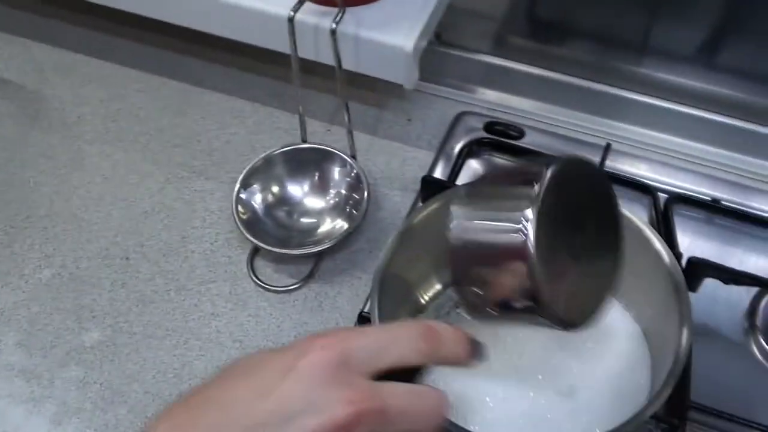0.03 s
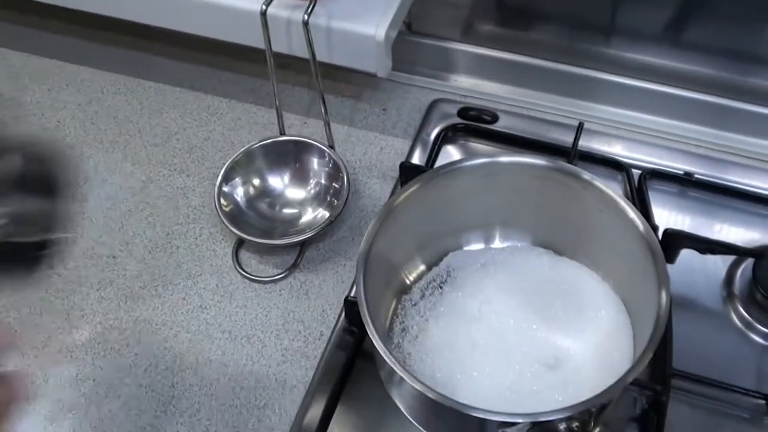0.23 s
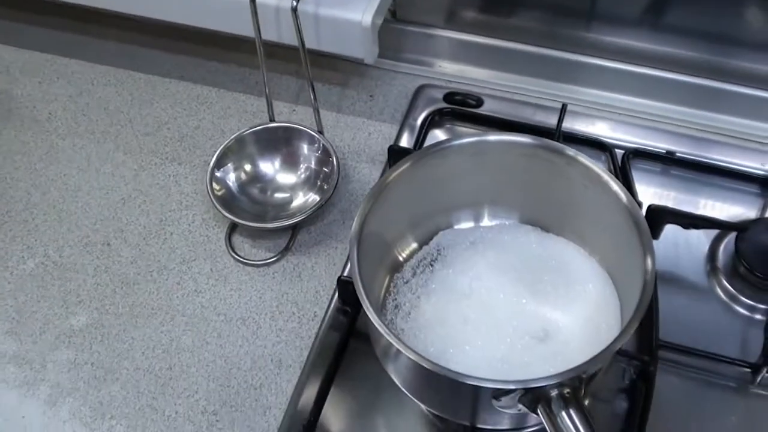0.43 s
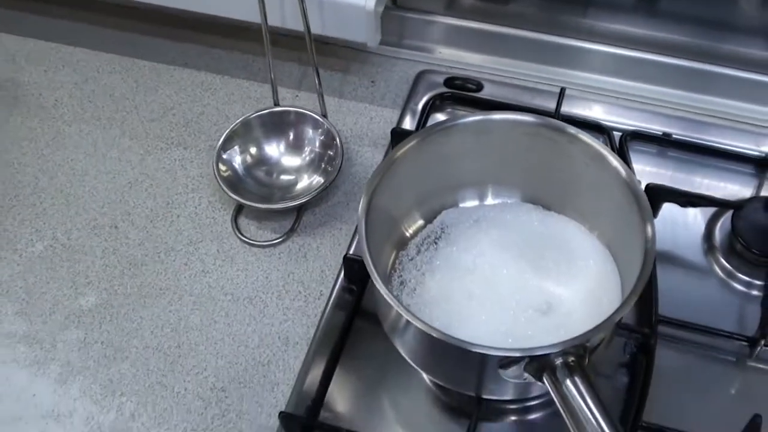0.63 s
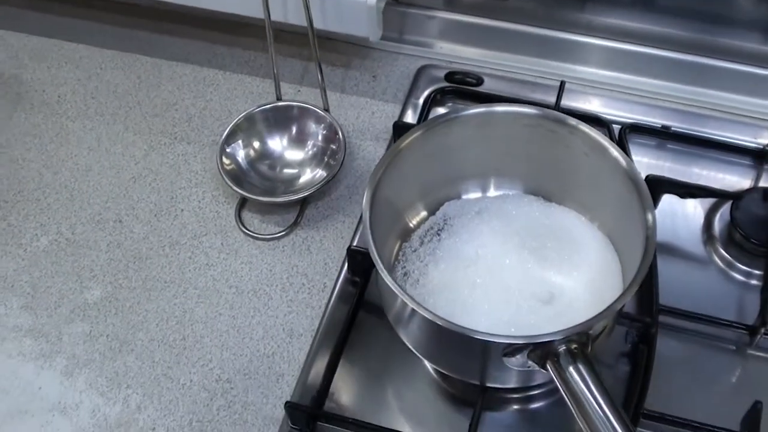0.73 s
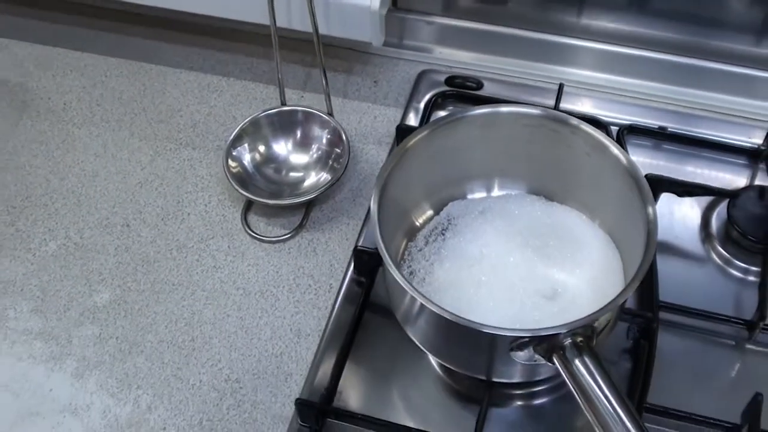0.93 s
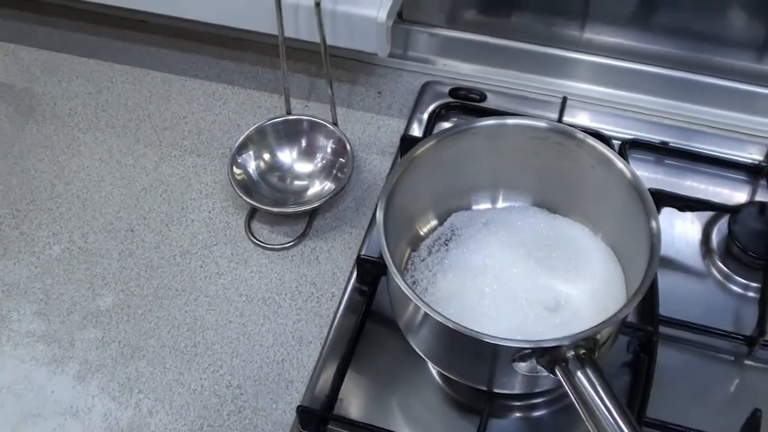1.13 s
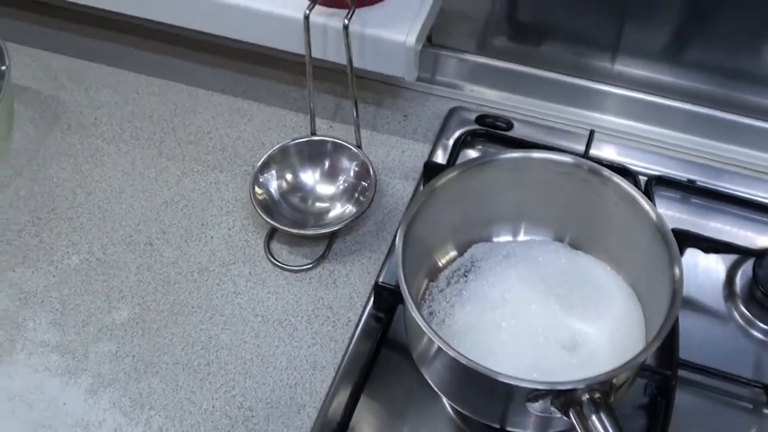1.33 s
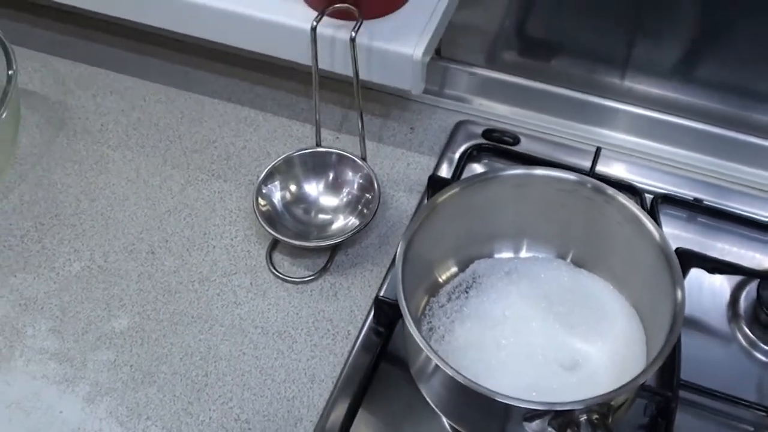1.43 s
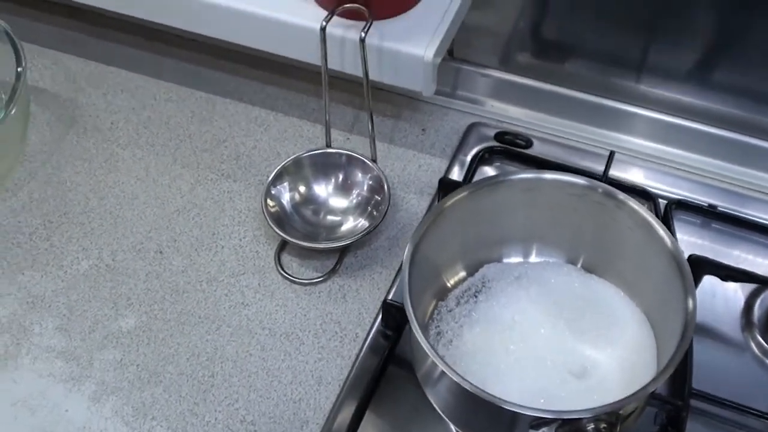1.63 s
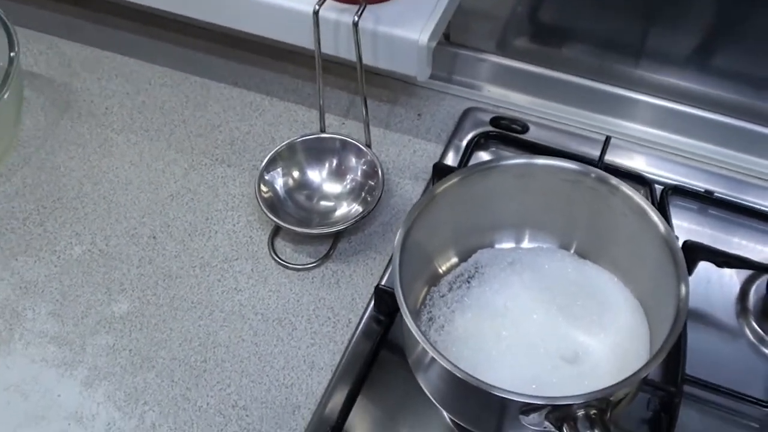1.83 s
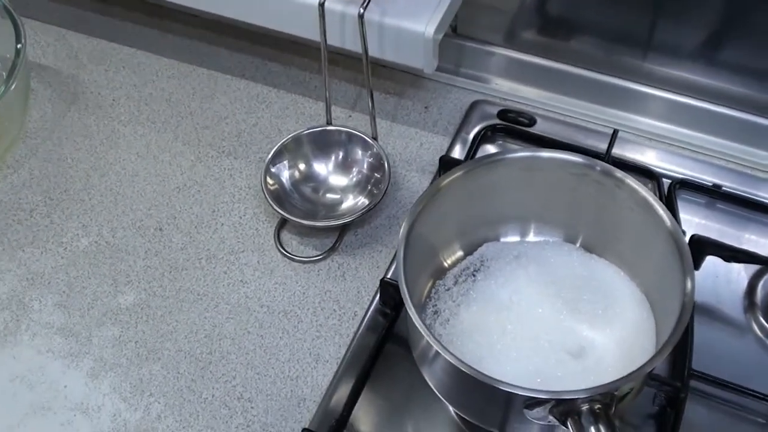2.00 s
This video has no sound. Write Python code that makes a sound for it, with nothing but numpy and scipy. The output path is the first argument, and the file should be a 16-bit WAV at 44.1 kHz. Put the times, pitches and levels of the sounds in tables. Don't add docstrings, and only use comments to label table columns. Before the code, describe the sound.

A metal cup clatters onto a hard kitchen worktop after a last faint hiss of sugar into a saucepan, then drags and bumps over grit; a metal bowl lands at the end. Close stereo microphone, low fan hum.

```python
import sys
import numpy as np
from scipy import signal
from scipy.fft import rfft, irfft, next_fast_len
from scipy.io import wavfile
from scipy.ndimage import map_coordinates

SR = 44100
rng = np.random.default_rng(int(sys.argv[2]) if len(sys.argv) > 2 else 0)


def gain_from_decibels(decibels):
    exponent = np.asarray(decibels, float) / 20
    return 10 ** exponent


def persist_wave(psi):
    counts = np.round(np.clip(psi, -1, 1) * 32767).astype(np.int16)
    wavfile.write(sys.argv[1], SR, np.atleast_2d(counts).T)


N = 91022

# t/s, worktop thud level/dB, base ring level/dB, clink level/dB, contact/ms
CUP_CONTACTS = [(0.711, -18.5, -2, -22, 1.03), (0.734, -26, -7, -51, 1.3), (.738, -21, -7, -36, 2),
                (.762, -32, -20.5, -36.5, 32), (0.802, -26.5, -9.5, -28.5, 3.9),
                (.826, -31.5, -42, -64, 3.8), (.86, -31, -31, -45, 120), (.914, -35, -52, -20, 8.8),
                (0.927, -20, -8.5, -13, 3.4), (0.939, -21.5, -28.5, -17.5, 7.5),
                (.984, -29, -46, -12.5, 2.75), (1.001, -20.5, -44, -25, 10), (1.023, -33.5, -55, -26, 3.3),
                (1.045, -36, -61, -35.5, 45)]
# f/Hz, level/dB
WORKTOP_COLOUR = [(150, -52), (290, -2), (430, -4.5), (490, -4.5), (800, 2), (1150, -1.5), (1500, -7.5),
                  (2300, -65)]
# f/Hz, t60/s
WORKTOP_T60 = [(300, 0.1), (900, 0.038), (2000, 0.026)]
# f/Hz, level/dB, t60/s
BASE_MODES = [(292, -12, .05), (433, -14, .04), (620, -14, .05), (790, -4, .018), (955, -7, .03),
              (1077, -12, .04), (1245, 0, .035), (1290, 2, .04), (1323, -18, .4), (1590, -30, .025)]
# f/Hz, level/dB, t60/s
WALL_MODES = [(2620, -12, .14), (2966, -18, .09), (4285, -3, .15), (4414, -16, .15), (5001, -15, .14),
              (5890, -9, .08), (6330, -9, .2), (6900, -12, .15), (7450, -10, .2), (7730, -13, .07),
              (8650, -14, .14), (10050, -20, .2), (10940, -21, .1), (12050, -22, .1)]
# f/Hz, level/dB
CRACK_COLOUR = [(900, -5.5), (3000, 3), (4300, -6.5), (7500, 4.5), (11000, -6.5), (15500, -18)]
# t/s, level/dB
EDGE_TAPS = [
    (0.735, -25.5),
    (.752, -40),
    (0.802, -34),
    (.914, -32),
]
# f/Hz, level/dB, t60/s
EDGE_MODES = [(1710, -2.5, 0.046), (2000, -1.5, 0.023), (2330, -10, .03)]
# t/s, level/dB
TINKLES = [
    (.13, -46.5),
]
# f/Hz, level/dB, t60/s
TINKLE_MODES = [(8750, 1, 0.53), (10000, -1, 0.29), (11300, -0.5, 0.42)]
# t/s, grit level/dB, rumble level/dB, wall ringing level/dB re grit
DRAG_LEVELS = [(1.16, -61, -57, -17), (1.183, -36, -39.5, -18), (1.22, -32, -43, -21.5),
               (1.26, -33.5, -60, -15), (1.29, -35.5, -30, -9.5), (1.32, -34.5, -38.5, -3),
               (1.36, -34, -38, -4.5), (1.41, -27.5, -33.5, -4), (1.455, -21.5, -39, -8),
               (1.5, -26.5, -28, -0.5), (1.54, -25.5, -24.5, -8.5), (1.58, -28, -31, -3.5),
               (1.64, -27, -34.5, -7), (1.71, -23.5, -28, -17), (1.76, -28.5, -29, -15),
               (1.82, -27, -37, -16), (1.9, -37.5, -39, -28), (1.96, -41, -41, -18)]
# f/Hz, level/dB
GRIT_COLOUR = [(600, -15.5), (1100, -4.5), (2300, -4.5), (3300, -6), (4900, -8), (6700, -5), (8500, -8),
               (15500, -37)]
# f/Hz, level/dB
RUMBLE_COLOUR = [(50, -42), (110, -13), (200, -7), (380, 3.5), (480, -6.5), (600, -4.5), (1200, -12),
                 (2500, -38)]
# f/Hz, width/Hz, level/dB
RIM_RESONANCES = [(4250, 220, 0), (6480, 160, -2), (6700, 160, 1), (6950, 260, -1), (8200, 300, -9)]
# t/s, level/dB, contact/ms
CATCHES = [
    (1.181, -42, 8),
    (1.284, -26.5, 10),
    (1.316, -26, 10),
    (1.376, -24, 8.9),
    (1.43, -31, 8),
    (1.448, -16, 10),
    (1.483, -29, 10),
    (1.723, -21.5, 3),
]
# t/s, knock level/dB, boom level/dB
BUMPS = [
    (1.185, -58, -44.5),
    (1.286, -30.5, -66),
    (1.326, -27, -62),
    (1.424, -22, -65),
    (1.452, -15.5, -49),
    (1.521, -56, -49),
    (1.705, -52, -25),
    (1.724, -27, -23.5),
]
# f/Hz, level/dB, t60/s
KNOCK_MODES = [(270, -3, .07), (430, -4, .07), (555, -2, .06), (710, -5, .07), (930, -9, .06)]
# f/Hz, level/dB, t60/s
BOOM_MODES = [(85.5, 3, .35), (138.4, 0, 0.35), (283, 2, 0.06), (336, 4, 0.18), (387, 4, .15),
              (440, 4, 0.1), (1125, -5, .1)]
# t/s, level/dB, contact/ms
BOWL_HITS = [
    (1.967, -13.5, 1.2),
    (1.973, -20, 3.8),
    (1.987, -25.5, 2.1),
    (2.001, -22, 5.5),
    (2.036, -27.5, 7.4),
]
# f/Hz, level/dB
BOWL_COLOUR = [(110, -4.5), (330, 6), (620, -5), (1000, 4), (1500, 3.5), (2300, -10), (4800, -23),
               (8500, -41)]
# f/Hz, t60/s
BOWL_T60 = [(300, 0.15), (1200, 0.039), (5000, 0.14)]
# f/Hz, level/dB, t60/s
BOWL_MODES = [(341, -12, .15), (1520, -16, .12), (2146, -9, .35), (2400, -15, .08), (3050, -17, .06),
              (4200, -16, .08), (4527, -15, .3), (4900, -20, .05), (6570, -19, .12), (6800, -20, .1),
              (7300, -23, .08), (7950, -22, .1), (10130, -30, .2)]
# t/s, level/dB
SKID_LEVELS = [
    (.556, -50),
    (.559, -24.5),
    (.58, -30.5),
    (.64, -36),
    (.682, -44),
    (.69, -62),
]
# f/Hz, level/dB
SKID_COLOUR = [(900, -18), (1500, -15.5), (2300, -9.5), (3600, -7), (4900, -9.5), (6200, -2), (8500, -11),
               (15500, -29)]
# t/s, level/dB
POUR_LEVELS = [
    (0, -38),
    (.045, -33.5),
    (.11, -39.5),
    (.17, -47),
    (.3, -56),
    (.4, -77),
]
# f/Hz, level/dB
POUR_COLOUR = [(400, -20), (900, -5), (1500, -1.5), (3400, -1.5), (7000, -5), (10000, -15), (15500, -26)]
# f/Hz, t60/s
ROOM_T60 = [(200, 0.43), (1500, 0.43), (10000, 0.14)]
# f/Hz, likeness/1
ROOM_ALIKE = [(100, 1), (600, 0.98), (2000, 0.7), (6000, 0.25), (12000, 1)]
# f/Hz, level/dB
AIR_COLOUR = [(25, -56), (60, -16.5), (250, -15.5), (500, -15), (900, -20), (3000, -24.5), (9000, -29),
              (16000, -38)]
# f/Hz, likeness/1
AIR_ALIKE = [(30, 0.83), (100, 1), (1000, 0.31), (5000, 0.73), (12000, 1)]
# f/Hz, rms level/dB
FAN_HUM = [(166, -56.5), (249, -51.5), (343, -55.5)]

SCATTER_DB, BASE_SCATTER_DB = 2, 1.5
RISE_MS = 0.89
GRIPPED_S, GRIPPED_T60_SHARE = .9, .6
SPLIT_LEVEL, BEAT_HZ = 0.81, 46.7
ECHO_SHIFT_SAMPLES, PREDELAY_SAMPLES = 2048, 200


def cup():
    out, crack = np.zeros(N), np.zeros(N)
    for s, thud_db, base_db, clink_db, ms in CUP_CONTACTS:
        thud = gain_from_decibels(thud_db + 29) * dying(WORKTOP_T60, WORKTOP_COLOUR)[0]
        base = gain_from_decibels(base_db + 2.0) * ringing(BASE_MODES, BASE_SCATTER_DB)
        add(out, s, struck(thud + base, ms, rough=0.46))
        t60_share = GRIPPED_T60_SHARE if s > GRIPPED_S else 1
        walls = ringing(np.multiply(WALL_MODES, [1, 1, t60_share]), SCATTER_DB)
        add(out, s, gain_from_decibels(clink_db - 9.5) * struck(walls, ms, rough=1.44))
        add(crack, s, gain_from_decibels(clink_db + 6) * contact(ms))
    for s, db in EDGE_TAPS:
        add(out, s, gain_from_decibels(db) * struck(ringing(EDGE_MODES, SCATTER_DB), 3.0, rough=1.16))
    for s, db in TINKLES:
        add(out, s, gain_from_decibels(db - 15.5) * struck(ringing(TINKLE_MODES), 11.0, rough=3.1))
    body = filtered(out, lambda hz: (1j * hz / (170 + 1j * hz)) ** 3)
    return body + filtered(crack, lambda hz: gain_from_decibels(along(CRACK_COLOUR, hz)))


def rim(f):
    return sum(gain_from_decibels(db) * 1j * f * w / (c * c - f * f + 1j * f * w) for c, w, db in RIM_RESONANCES)


def drag():
    grit, rumble, ring = gains(DRAG_LEVELS)
    judder = gain_from_decibels(0.48 * wobble(24.46) + 1.4 * wobble(110))
    crunch = gain_from_decibels(-2.5) * judder * grains(GRIT_COLOUR, 5000, spread_db=-2.0, smooth=1.17)
    walls = unit(filtered(rng.standard_normal(N), rim)) * gain_from_decibels(1.5 * wobble(30))
    shake = gain_from_decibels(-2 + 2 * wobble(30)) * grains(RUMBLE_COLOUR, 900, spread_db=2, smooth=1.5)
    out = grit * (crunch + ring * walls) + rumble * shake
    catches = np.zeros(N)
    for s, db, ms in CATCHES:
        add(catches, s, gain_from_decibels(db) * contact(ms))
    out = out + filtered(catches, lambda hz: gain_from_decibels(8) * rim(hz) + gain_from_decibels(along(GRIT_COLOUR, hz)))
    for s, knock_db, boom_db in BUMPS:
        knock = gain_from_decibels(knock_db - 2) * ringing(KNOCK_MODES, SCATTER_DB)
        boom = gain_from_decibels(boom_db - 5.5) * ringing(BOOM_MODES, SCATTER_DB)
        add(out, s, struck(knock + boom, 3.2, rough=0.97))
    return out


def bowl():
    out = np.zeros(N)
    for s, db, ms in BOWL_HITS:
        thud = gain_from_decibels(23) * dying(BOWL_T60, BOWL_COLOUR)[0]
        ring = gain_from_decibels(-6.5) * ringing(BOWL_MODES, SCATTER_DB)
        add(out, s, gain_from_decibels(db) * struck(thud + ring, ms, rough=1.18))
    return out


def cup_skid():
    crunch = grains(SKID_COLOUR, 4800, spread_db=4, smooth=0.58)
    return gains(SKID_LEVELS)[0] * gain_from_decibels(0.91 * wobble(91.0)) * crunch


def sugar_stream():
    patter = grains(POUR_COLOUR, 5400, spread_db=-1.5, smooth=0.86)
    return gains(POUR_LEVELS)[0] * gain_from_decibels(0.5 + 2.9 * wobble(41.2)) * patter


def room(x):
    shift = ECHO_SHIFT_SAMPLES
    starts, i = np.arange(0, N, shift), np.arange(2 * shift)
    padded = np.pad(x, (shift + PREDELAY_SAMPLES, 2 * shift))
    parts = padded[starts[:, None] + i] * np.sin(i * np.pi / (2 * shift))
    tails = dying(ROOM_T60, [(100, 0)], channels=2 * len(starts)).reshape(2, len(starts), -1)
    wet = signal.fftconvolve(parts[None], tails, axes=2).transpose(1, 2, 0)
    echo = np.zeros((N + 2 * shift, 2))
    for k, part in zip(starts, wet):
        add(echo, k / SR, part)
    return paired(echo[shift:][:N].T, ROOM_ALIKE, [(100, 0.013)])


def air():
    t = np.arange(N) / SR
    hum = np.zeros(N)
    for hz, db in FAN_HUM:
        level = gain_from_decibels(db + 0.5 + 8.3 * wobble(9.5))
        hum += level * np.sin(2 * np.pi * hz * t + 2.0 * wobble(8.6))
    noise = paired(rng.standard_normal((2, N)), AIR_ALIKE, AIR_COLOUR)
    return gain_from_decibels(-43) * unit(noise) + hum


def contact(ms):
    t_ms = np.arange(SR // 10) / SR * 1000
    return (1 - np.exp(-t_ms / RISE_MS)) * np.exp(-t_ms / ms) * rng.standard_normal(len(t_ms))


def struck(answer, ms, rough):
    force = contact(ms)
    push = signal.unit_impulse(len(force))
    return signal.fftconvolve(rough * force / np.linalg.norm(force) + push, answer)


def ringing(modes, scatter_db=0):
    t = np.arange(SR // 3) / SR
    z, u = rng.standard_normal((2, len(modes)))
    out = np.zeros(len(t))
    for k, (hz, db, t60) in enumerate(modes):
        tone = np.sin(2 * np.pi * hz * t)
        if hz > 2000:
            twin_hz = hz + BEAT_HZ * (1 + u[k] / 4)
            tone += SPLIT_LEVEL * np.sin(2 * np.pi * twin_hz * t + u[k])
        out += (-1) ** k * gain_from_decibels(db + scatter_db * z[k] - 60 * t / t60) * tone
    return out


def dying(t60s, colour, channels=1):
    hz, t, z = signal.stft(rng.standard_normal((channels, SR // 3)), SR, nperseg=256)
    x = signal.istft(z * gain_from_decibels(-60 * t / along(t60s, hz)[:, None]), SR, nperseg=256)[1]
    n = x.shape[1]
    x = irfft(rfft(x) * gain_from_decibels(along(colour, np.fft.rfftfreq(n, 1 / SR))), n)
    return x[:, :SR // 3] / np.linalg.norm(x[0])


def grains(colour, rate, spread_db, smooth):
    u, e = rng.random(N), rng.exponential(size=N)
    g, noise = rng.standard_normal((2, N))
    present = np.clip((rate / SR - u) * SR / 100, 0, 1)
    hits = unit(g * gain_from_decibels(spread_db * np.minimum(e, 3)) * present)
    return unit(filtered(hits + smooth * noise, lambda hz: gain_from_decibels(along(colour, hz))))


def unit(x):
    return x / np.sqrt(np.mean(x ** 2) + 1e-20)


def along(points, hz):
    f, v = np.transpose(points)
    return np.interp(np.log(hz + 1), np.log(f + 1), v)


def gains(rows):
    s, *cols = np.transpose(rows)
    t = np.arange(N) / SR
    return [gain_from_decibels(np.interp(t, s, c, left=-120, right=-120)) for c in cols]


def wobble(rate_hz):
    return map_coordinates(rng.standard_normal(N // 100), [np.arange(N) * rate_hz / SR])


def filtered(x, response):
    m = next_fast_len(N + 8192)
    return irfft(rfft(x, m) * response(np.fft.rfftfreq(m, 1 / SR)), m)[..., :N]


def add(out, s, x):
    part = out[round(s * SR):][:len(x)]
    part += x[:len(part)]


def placed(x, pan_db):
    return filtered(x, lambda hz: gain_from_decibels(np.outer([.5, -.5], pan_db * hz ** 2 / (hz ** 2 + 500 ** 2))))


def paired(pair, alike, colour):
    def response(hz):
        turn = np.arccos(np.clip(along(alike, hz), 0, 1)) / 2
        return gain_from_decibels(along(colour, hz)) * [np.cos(turn), np.sin(turn)]
    mid, side = filtered(pair, response)
    return np.array([mid + side, mid - side])


def scene():
    sources = [cup(), drag(), bowl(), cup_skid(), sugar_stream()]
    pans_db = [2.5, 2.2, 2.5, 2.2, 0.5]
    near = sum(placed(x, pan_db) for x, pan_db in zip(sources, pans_db))
    return near + gain_from_decibels(-9) * room(sum(sources)) + air()


def low_pass(x):
    return signal.sosfilt(signal.butter(12, 16150, fs=SR, output="sos"), x)


def record(dry):
    soft = dry / (1 + np.abs(dry / .98) ** 6) ** (1 / 6)
    mix = filtered(soft, lambda hz: (hz < 16100) * (1j * hz / (55 + 1j * hz)) ** 2)
    return low_pass(mix)


dry = scene()
out = record(dry)
persist_wave(out)
```